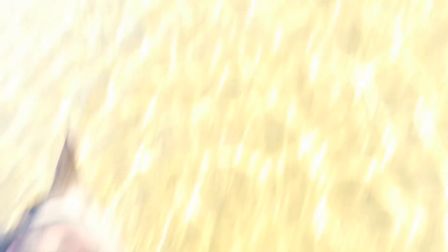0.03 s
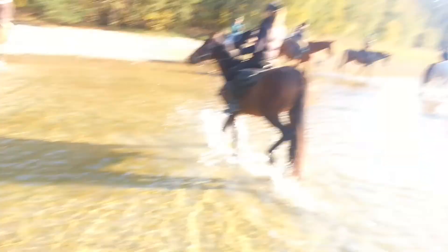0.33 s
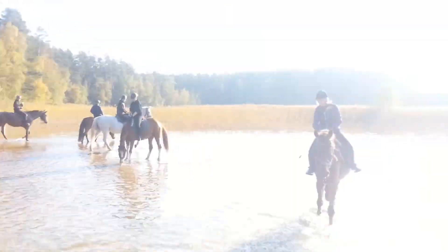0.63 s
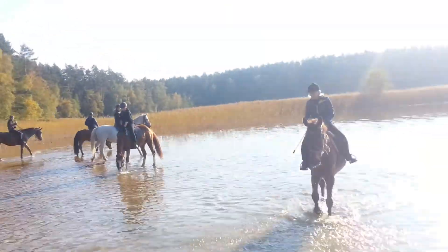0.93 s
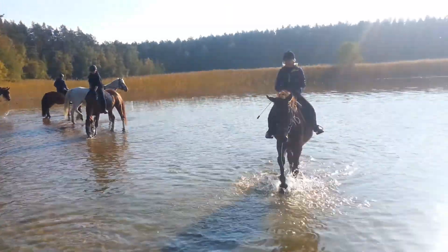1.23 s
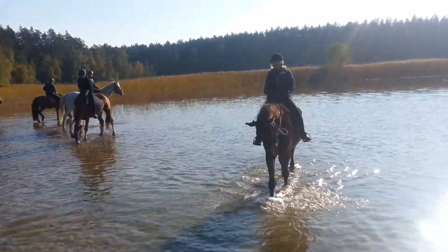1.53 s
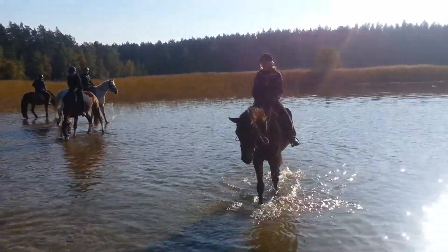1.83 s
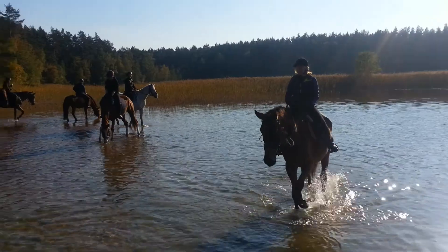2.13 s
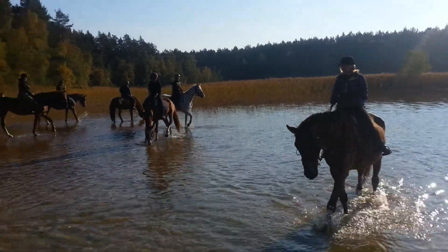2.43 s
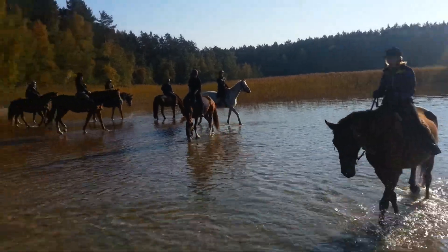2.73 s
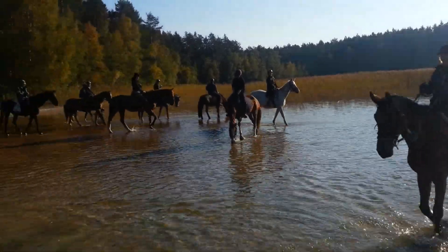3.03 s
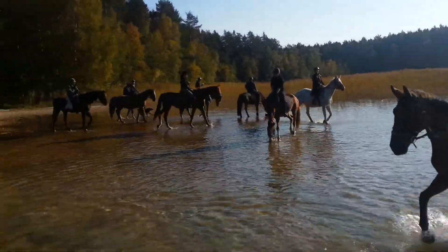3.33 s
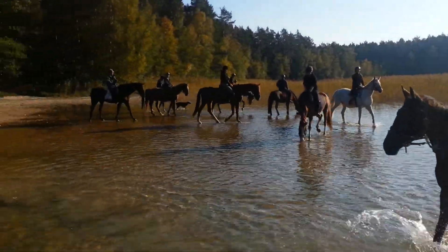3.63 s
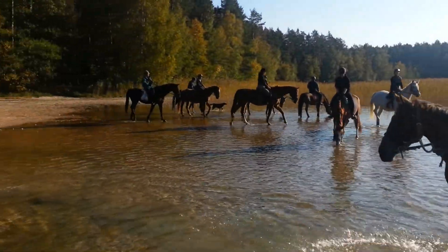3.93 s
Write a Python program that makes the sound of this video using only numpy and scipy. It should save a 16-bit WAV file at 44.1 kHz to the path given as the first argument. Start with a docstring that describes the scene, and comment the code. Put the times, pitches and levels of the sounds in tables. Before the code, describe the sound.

A horse wades through shallow lake water close by, slightly to the right, splashing and sloshing for the whole four seconds. Its hooves plunge with low gulps, and thrown water slaps down into bubbles and spray. Wind thumps on the left of the microphone in the first half second. Sharper splashes come around 2 and 2.8 seconds, and the spray brightens near the end, over a soft wash of distant wading.

```python
"""A horse wades past through a shallow lake, close to the microphones.
Hooves plunge and trap gulps of air; thrown water slaps down and breaks into bubbles and spray.
The splashes are built from ringing bubbles, each a short decaying sine, smeared by the ripples.
Other horses wade further off as a smooth wash. Wind buffets the left microphone at first;
that port also rings in the treble."""
import sys
import numpy as np
from scipy import signal
from scipy.fft import rfft, irfft
from scipy.io import wavfile

SR = 44100
rng = np.random.default_rng(int(sys.argv[2]) if len(sys.argv) > 2 else 0)


def wrap_up_sound(samples):
    """Save the sound to the file named by the first command line argument, as 16-bit audio."""
    columns = np.atleast_2d(samples).T
    # keep every value between -1 and 1, then stretch to whole-number steps
    tamed = np.clip(columns, -1, 1)
    steps = np.round(tamed * 32767).astype(np.int16)
    wavfile.write(sys.argv[1], SR, steps)


N = 176400
T = np.arange(N) / SR

# EQ curves of the layers (frequency [Hz], gain [dB])
WASH_EQ = [(25, 13), (150, -36), (500, -5), (1500, -20), (3000, -22.5), (6000, -9.5), (14000, -26)]
WIND_EQ = [(20, -37), (55, 3), (110, 0.5), (250, -2.5), (450, -11), (1200, -40)]
SLOSH_EQ = [(40, -15), (70, -4), (160, -1), (280, -1.5), (480, 1.5), (680, -3), (950, -23), (2000, -55)]
SPLASH_EQ = [(350, 5.5), (700, 0), (1700, -4.5), (2200, -4), (2900, -9), (4200, -4.5), (8000, -29)]
SPRAY_EQ = [(3000, -2), (4200, 0), (5500, 3), (7500, 1), (10000, -10), (12500, -7.5), (15000, -24)]
GUSH_EQ = [(500, -14), (1300, -11), (3500, 11.5), (8000, 1), (14000, -3)]
# fader rides of the continuous layers (time [s], relative level [dB])
WIND_RIDE = [(0, -30), (.2, -38.5), (.35, -27.5), (.47, -46), (.64, -76), (.74, -49), (1.02, -39.5),
             (1.1, -69)]
WAKE_RIDE = [(0, -42.5), (1.2, -42), (4, -50.5)]
SLOSH_RIDE = [(0, -42), (.4, -44), (.48, -44.5), (.57, -39), (.72, -35.5), (.85, -42), (1.62, -36),
              (1.73, -45), (2.0, -39), (2.55, -39.5), (2.76, -44.5), (2.85, -45.5), (3.05, -42.5),
              (3.62, -35), (3.7, -45), (3.9, -37.5), (4, -45)]
SPLASH_RIDE = [(0, -38), (.53, -39.5), (.62, -36), (.68, -40), (.8, -40), (1.1, -41), (1.4, -44.5),
               (1.55, -41), (1.97, -43.5), (2.13, -40), (2.2, -46), (2.42, -39), (2.52, -42), (2.75, -38.5),
               (2.87, -43.5), (3.02, -37.5), (3.3, -42), (3.52, -42), (3.61, -36.5), (3.7, -42.5),
               (3.95, -37)]
SPRAY_RIDE = [(0, -39), (.23, -34.5), (.42, -34.5), (.63, -33), (.78, -39), (.98, -36), (1.07, -38.5),
              (1.22, -35), (1.36, -40), (1.48, -34.5), (1.66, -35.5), (1.95, -39), (2.15, -36), (2.21, -42),
              (2.38, -35), (2.52, -39), (2.67, -35.5), (3.27, -38.5), (3.35, -34), (3.44, -37), (3.61, -33),
              (3.7, -36.5), (3.82, -35), (3.95, -29.5), (4, -28)]
# wind thumps on the left port (time [s], relative level [dB], pitch [Hz])
WIND_BUFFETS = [(0.195, -17.5, 134), (.301, -16.5, 134), (0.338, -11, 189), (0.369, -15.5, 116),
                (0.418, -18, 203)]
# sheets of spray raining down at once (time [s], level [dB], half length [s])
SPRAY_SHEETS = [(0.23, -41, 0.012), (.625, -35, 0.015), (0.871, -37, 0.022), (1.024, -31.5, 0.0073),
                (1.15, -34.5, 0.013), (1.251, -35.5, 0.0087), (1.84, -39.5, 0.021), (2.424, -39, 0.01),
                (2.754, -28.5, 0.0054), (3.006, -34.5, 0.01), (3.325, -30, 0.0043), (3.614, -34.5, 0.013)]
# large drops landing close by (time [s], relative level [dB])
CLOSE_DROPS = [(.4499, -30), (0.959, -22), (1.4771, -22.5), (2.058, -27.5), (2.37, -26), (3.344, -19.5),
               (3.579, -21), (3.768, -21.5), (3.9412, -22), (3.97, -18)]
# thrown water slapping the surface (time [s], relative level [dB], pitch [Hz])
WATER_SLAPS = [(0.0873, -21, 1670), (.5994, -25, 1460), (0.6207, -25, 1760), (.7372, -31, 1460),
               (1.2417, -25, 1700), (1.7738, -28, 2130), (1.9133, -26.5, 1010), (2.0587, -17.5, 1510),
               (2.155, -23.5, 2180), (2.4282, -21, 1900), (2.7494, -26, 1020), (3.34, -25, 9000),
               (3.5966, -25, 1110), (3.622, -35, 1400), (3.9562, -27, 1660)]
# gurgling air pockets (time [s], length [s], level [dB], start pitch [Hz], end pitch [Hz])
AIR_POCKETS = [(2.2, .06, -34, 360, 600), (2.752, .055, -33, 640, 370)]
# hooves gulping air under water (time [s], relative level [dB], pitch [Hz])
HOOF_PLUNGES = [(.003,-24,315), (.124,-25.5,327), (0.232,-21.5,271), (0.548,-22.5,520), (0.6,-23.5,457),
                (0.654,-26.5,366), (.714,-31,354), (0.79,-31.5,161), (0.905,-23,312), (0.94,-21,377),
                (0.961,-25.5,333), (.972,-24.5,606), (1.131,-33.5,223), (1.244,-25,624), (1.389,-27.5,450),
                (1.506,-43,281), (1.591,-28,485), (1.615,-27.5,500), (1.648,-24,418), (1.658,-22,550),
                (1.784,-29,600), (2.013,-21.5,380), (2.043,-26.5,475), (2.202,-31.5,180), (2.284,-30,172),
                (2.465,-33.5,197), (2.553,-27.5,510), (2.562,-27,243), (2.737,-25,403), (2.867,-36,156),
                (3.059,-29,442), (3.228,-22.5,298), (3.233,-26.5,594), (3.354,-32.5,173), (3.468,-32.5,177),
                (3.584,-35,497), (3.611,-33.5,188), (3.748,-32.5,156)]
# tone of the two microphone ports (frequency [Hz], gain [dB])
LEFT_PORT_EQ = [(60, 0), (400, 1), (1000, 5), (1700, 8), (2800, -3), (4000, 0), (5100, 9), (5600, 9.5),
                (6300, 3), (7500, -2), (9800, -0.5), (13000, -1)]
RIGHT_PORT_EQ = [(60, -2), (850, 0.5), (1700, 2), (2900, -2), (5000, -2), (7300, 1), (10000, 5),
                 (12000, -3.5), (14000, -17)]
# lag of the left port behind the right (frequency [Hz], phase [rad])
LEFT_LAG = [(0, 0), (600, .5), (900, 1.3), (1500, 3.6), (2330, 6.1), (5500, 18), (15000, 45)]


def amp(db):
    """Decibels to gain."""
    return 10 ** (np.asarray(db) / 20)


def unit(x):
    """Scales to an rms of one."""
    return x / np.sqrt(np.mean(x ** 2) + 1e-20)


def fader(points):
    """Gain over time from (time [s], level [dB]) points."""
    return amp(np.interp(T, *np.transpose(points)))


def eq(x, points):
    """Filters by a curve of (frequency [Hz], gain [dB]) points."""
    hz, db = np.transpose(points)
    f = np.fft.rfftfreq(2 * N, 1 / SR)
    gain = amp(np.interp(np.log(f + 1), np.log(hz), db))
    return irfft(rfft(x, 2 * N) * gain)[..., :N]


def add(mix, s, sound):
    """Mixes a sound in at time s."""
    part = mix[max(round(s * SR), 0):][:len(sound)]
    part += sound[:len(part)]


def flutter(rate_hz):
    """Random modulation with an rms of one, rolling off above rate_hz."""
    f = np.fft.rfftfreq(N, 1 / SR)
    spectrum = rfft(rng.standard_normal(N)) * (f > 2) / (1 + (f / rate_hz) ** 2)
    return unit(irfft(spectrum, N))


def bubble(hz, cycles, rise, swell=4):
    """A trapped bubble: a sine that swells, rises in pitch and decays by 1/e every `cycles` periods."""
    age = np.arange(0, 6, hz / cycles / SR)  # in decay times
    envelope = (1 - np.exp(-age * swell)) * np.exp(-age)
    ring = envelope * np.sin(2 * np.pi * cycles * (age + rise * age ** 2 / 2))
    return ring / abs(ring).max()


def burst(hz, cycles, rise, after_db, after_s, octaves, count, swell=4):
    """One main bubble and a few smaller ones that break off it."""
    out = np.zeros(SR // 4)
    add(out, 0, bubble(hz, cycles, rise, swell))
    for when, pitch, size in rng.random((count, 3)):
        fragment = bubble(hz * 2 ** (octaves * pitch - .5), cycles, rise, swell)
        add(out, when * after_s, amp(after_db) * size * fragment)
    return out


def cloud(lo_hz, hi_hz, per_s, cycles, spread_db, spread_s, pitches=14):
    """Bubbles of random timing and strength; each reaches the right port a little earlier or later."""
    out = np.zeros((2, N))
    candidates = 4000
    for hz in np.geomspace(lo_hz, hi_hz, pitches):
        when, chance, size, side, polarity = rng.random((candidates, 5)).T
        sounding = chance * candidates < per_s / pitches * N / SR
        size_db = spread_db * np.minimum(-np.log(1 - size), 3.5)
        height = sounding * np.sign(polarity - .5) * amp(size_db)
        left_at = (when * N).astype(int)
        right_at = (left_at + np.round((2 * side - 1) * spread_s * SR).astype(int)) % N
        triggers = np.array([np.bincount(at, height, N) for at in (left_at, right_at)])
        out += signal.oaconvolve(triggers, hz * bubble(hz, cycles, rise=.068)[None], axes=1)[:, :N]
    return out


def ripples(x, wet_db, t60, frame=256):
    """Rippling water scatters each sound into a short, ever-changing tail, different at each port."""
    framing = dict(nperseg=frame, noverlap=frame * 3 // 4)
    power = abs(signal.stft(x, **framing)[2]) ** 2
    feedback = amp(-120 * frame / 4 / SR / t60)  # power falls 60 dB in t60 seconds
    power = signal.lfilter([0, 1 - feedback], [1, -feedback], power)
    real, imag = rng.standard_normal((2, 2) + power.shape[-2:])
    tail = signal.istft(np.sqrt(2 * power) * (real + 1j * imag), **framing)[1]
    return x + amp(wet_db) * tail[:, :N]


def wash():
    """The bed: a smooth rush of the distant horses and the open shore."""
    return amp(-44) * unit(eq(rng.standard_normal((2, N)), WASH_EQ))


def wind():
    """Lumpy wind rumble, mostly on the left port, with a few hard buffets."""
    rumble = eq(rng.standard_normal((2, N)), WIND_EQ)
    air = fader(WIND_RIDE) * unit(rumble * amp(5.1 * flutter(rate_hz=29)))
    for s, db, hz in WIND_BUFFETS:
        add(air[0], s, amp(db) * bubble(hz, cycles=.31, rise=.044))  # damped to a thump
    return air * amp([[3], [-5]])


def wake():
    """Small bubbles fizz around the horse that carries the microphones, and fade."""
    fizz = cloud(1920, 3430, per_s=1500, cycles=1.4, spread_db=2, spread_s=.00043, pitches=8)
    return fader(WAKE_RIDE) * unit(fizz)


def slosh():
    """The low body: large bubbles in the water churned by the legs."""
    churn = cloud(86.6, 1048, per_s=380, cycles=2.57, spread_db=2.5, spread_s=.0002, pitches=24)
    water = eq(ripples(churn, wet_db=-8, t60=.51, frame=512), SLOSH_EQ)
    return amp(-2.5) * fader(SLOSH_RIDE) * unit(water)


def splash():
    """The mids: clumps of small bubbles where sheets of water fall back; a few ring on as plinks."""
    bubbles = cloud(582, 4430, per_s=3000, cycles=1.8, spread_db=1.5, spread_s=.00027, pitches=16)
    plinks = cloud(750, 2500, per_s=90, cycles=5, spread_db=2.5, spread_s=.00018, pitches=10)
    water = ripples(unit(bubbles) + amp(-7) * unit(plinks), wet_db=-4, t60=.07)
    clumps = amp(1.4 * flutter(rate_hz=33))
    return fader(SPLASH_RIDE) * unit(eq(water, SPLASH_EQ) * clumps)


def spray():
    """The top end: thousands of droplets tick on the lake in bursts."""
    ticks = cloud(2490, 14100, per_s=5000, cycles=1.45, spread_db=4, spread_s=.0003)
    water = eq(ripples(ticks, wet_db=1, t60=.075), SPRAY_EQ)
    flicker = amp(.66 * flutter(rate_hz=23))
    return amp(-1.52) * fader(SPRAY_RIDE) * unit(water * flicker)


def gushes():
    """A whole sheet of droplets lands within a moment."""
    droplets = cloud(840, 11300, per_s=8300, cycles=.53, spread_db=-3.5, spread_s=.00024, pitches=10)
    swells = sum(amp(db) / (1 + ((T - s) / half_s) ** 4) for s, db, half_s in SPRAY_SHEETS)
    return swells * unit(eq(droplets, GUSH_EQ))


def drops():
    """Single large drops land close by with a bright tick."""
    out = np.zeros(N)
    for s, db in CLOSE_DROPS:
        tick = burst(hz=5240, cycles=2.6, rise=.01, after_db=-2, after_s=.0024, octaves=.8, count=7)
        add(out, s, amp(db - 1.5) * tick)
    return ripples(out, wet_db=-.5, t60=.026, frame=64)


def slaps():
    """A lump of water lands flat: a short crack and its small bubbles."""
    out = np.zeros(N)
    for s, db, hz in WATER_SLAPS:
        crack = burst(hz, cycles=.62, rise=.007, after_db=-2, after_s=.004, octaves=1.8, count=9)
        add(out, s, amp(db + 1.5) * crack)
    return ripples(out, wet_db=-8, t60=.06, frame=128)


def gurgles():
    """An air pocket behind a leg shrinks or opens, and its note slides unevenly up or down."""
    out = np.zeros(N)
    for s, length_s, db, start_hz, end_hz in AIR_POCKETS:
        n = round(length_s * SR)
        hz = np.geomspace(start_hz, end_hz, n) * np.exp(.11 * flutter(rate_hz=84)[:n])
        note = np.sin(2 * np.pi * np.cumsum(hz) / SR)
        add(out, s, amp(db) * np.hanning(n) ** .5 * note)
    return out


def plunges():
    """A hoof pulls air down and the pocket closes with a gulp."""
    out = np.zeros(N)
    for s, db, hz in HOOF_PLUNGES:
        gulp = burst(hz, cycles=1.3, rise=.04, after_db=-8.5, after_s=.02, octaves=2, count=7, swell=1)
        add(out, s, amp(db - 1.5) * gulp)
    return ripples(out, wet_db=-14, t60=.1, frame=512)


def scene():
    """Near water over wash and wind; it lies to the right, so it reaches the left port late."""
    near = slosh() + splash() + spray() + gushes() + wake() + plunges() + gurgles() + slaps() + drops()
    lag = np.interp(np.fft.rfftfreq(2 * N, 1 / SR), *np.transpose(LEFT_LAG))
    left = irfft(rfft(near[0], 2 * N) * np.exp(-1j * lag))[:N]
    return np.array([left, near[1]]) + wash() + wind()


def record(dry):
    """The tone of each microphone port, a low cut, then a steep high cut."""
    ports = np.array([eq(dry[0], LEFT_PORT_EQ), eq(dry[1], RIGHT_PORT_EQ)])
    low_cut = signal.butter(4, 42, "highpass", fs=SR, output="sos")
    high_cut = signal.firwin(401, 14600, window=("kaiser", 9), fs=SR)
    return signal.oaconvolve(signal.sosfilt(low_cut, ports), high_cut[None], "same")


dry = scene()
out = record(dry)
wrap_up_sound(out)
```